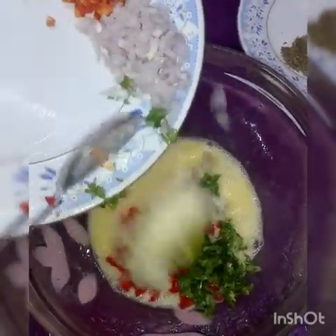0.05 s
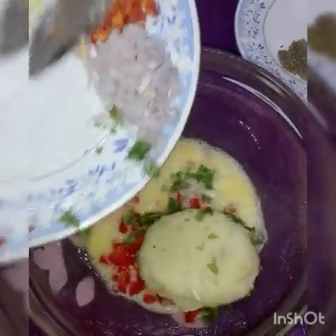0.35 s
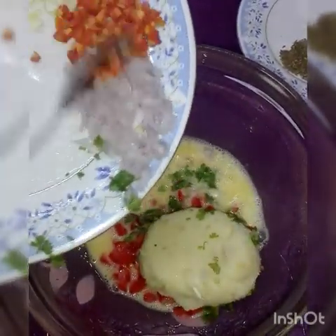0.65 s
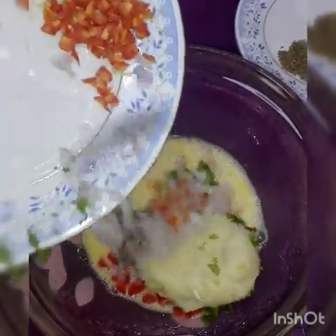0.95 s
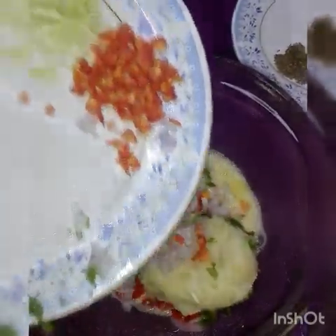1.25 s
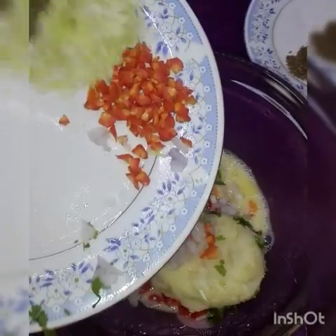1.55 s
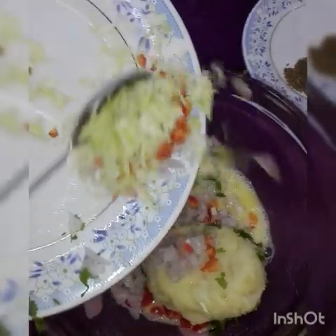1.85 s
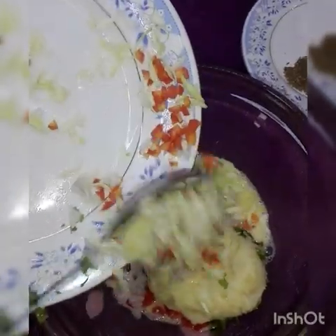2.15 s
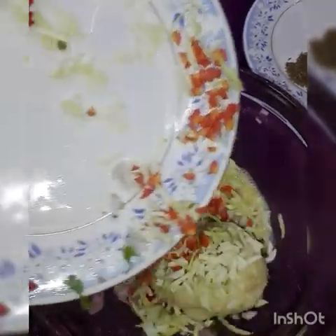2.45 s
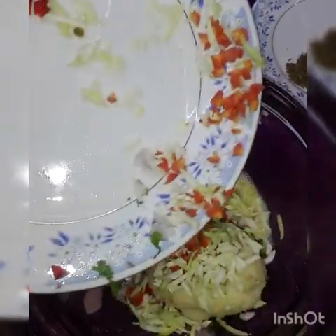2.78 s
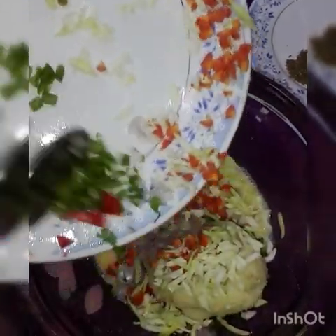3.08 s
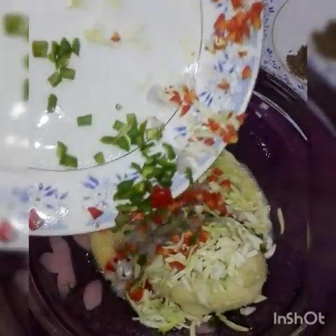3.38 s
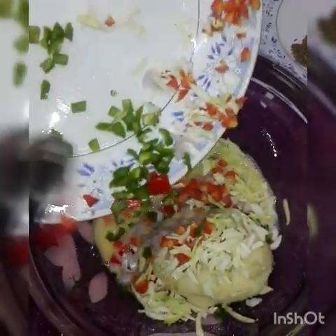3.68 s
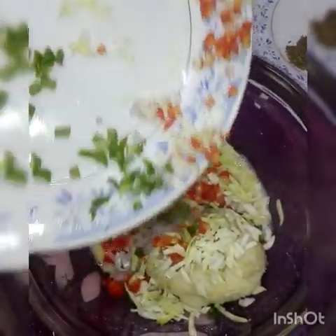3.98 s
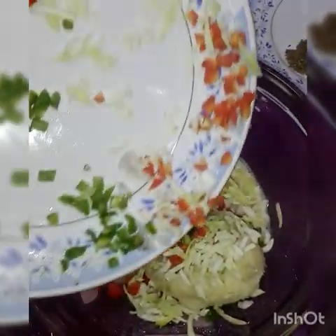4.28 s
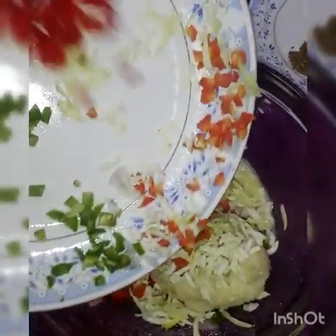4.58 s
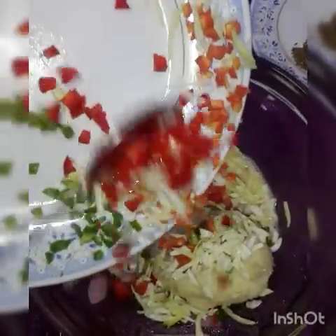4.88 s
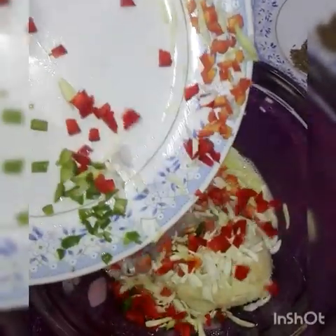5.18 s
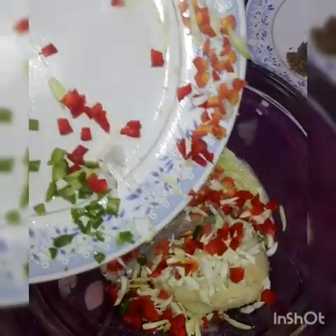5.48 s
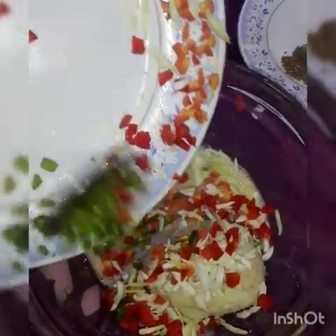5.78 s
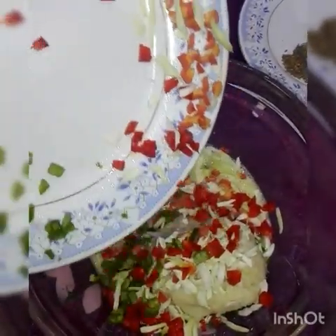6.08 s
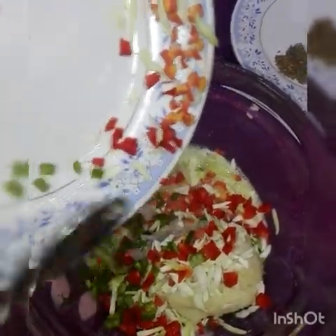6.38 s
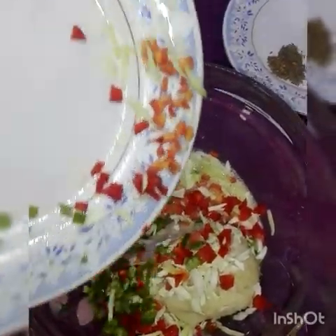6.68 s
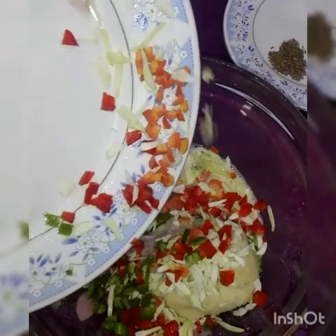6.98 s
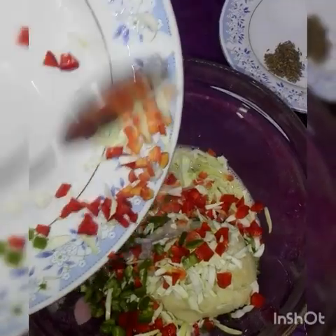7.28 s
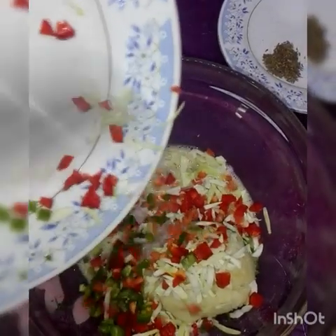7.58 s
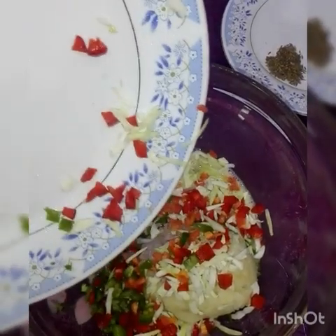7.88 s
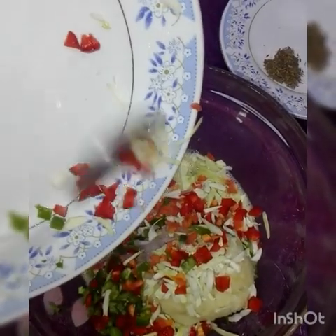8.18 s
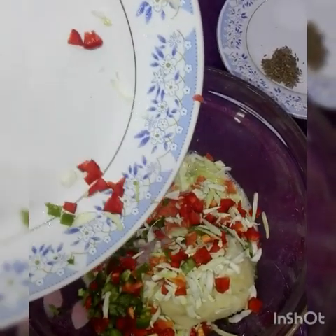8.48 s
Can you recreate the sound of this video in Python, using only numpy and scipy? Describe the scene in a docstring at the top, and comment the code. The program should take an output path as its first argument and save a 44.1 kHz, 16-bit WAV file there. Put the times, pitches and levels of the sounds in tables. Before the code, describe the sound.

In a small kitchen, a steel spoon pushes chopped vegetables off a china plate into a bowl, close to the microphone. A few bright clinks come first, with a faint wet crackle of falling pieces. Irregular taps and short scrapes over the glaze follow, some leaving a soft ring. A low rumble fills the room, and at the very end a faint two-tone horn sounds far outside.

```python
"""A steel spoon pushes chopped vegetables off a hand-held china plate into a bowl in a small kitchen.
Each stroke lands with a clink and scrapes over the glaze; both drive the plate's modes, the tones it
naturally rings at. A soft ring sings on after a touch or lift. Wet pieces tick as they fall.
A low rumble fills the room, and at the end a two-tone horn sounds far outside."""
import sys
import numpy as np
from scipy import signal
from scipy.fft import rfft, irfft, next_fast_len
from scipy.io import wavfile
from scipy.ndimage import map_coordinates

SR = 44100
rng = np.random.default_rng(int(sys.argv[2]) if len(sys.argv) > 2 else 0)


def output_pcm(signal):
    """Save a mono or channel-first signal as 16-bit PCM at the path in sys.argv[1].

    Samples are clipped to [-1, 1] before scaling.
    """
    pcm = np.clip(np.atleast_2d(signal).T, -1, 1) * 32767
    wavfile.write(sys.argv[1], SR, np.round(pcm).astype(np.int16))


N = 381024
TIME = np.arange(N) / SR

# The plate's modes with the spoon on it. A t60 is the time a sound takes to fade by 60 dB.
# (pitch [Hz], level hit at the rim [dB], level hit in the centre [dB], base t60 [s], full bend [Hz])
PLATE_MODES = [(327, -21, -22.5, 0.035, 1.5), (549, -19, -19.5, 0.027, 0), (772, -9, -8.5, 0.029, -2),
               (963, -11.5, -9, 0.062, -130), (1183, -3, -15.5, 0.14, 1), (1356.4, 0, -3, 0.18, 96),
               (1994, -3, -17, 0.13, 80), (2207, -7, -9.5, .12, 91.5), (2574, -18.5, -22.5, 0.09, -150),
               (2915, -9, -8.5, .09, 139), (3136, -4, 3.5, 0.063, 54), (3616, -12, 4, .09, 38),
               (3985, -6, -11, 0.095, -3), (4134, -6.5, -6.5, .09, 40), (4495, -15, -26, 0.089, -100),
               (5228, -5.5, -14, 0.066, 204), (5494, -9.5, -8.5, 0.081, 200), (5747, -8.5, -6, .15, 169),
               (6510, -12.5, -16.5, 0.094, -200), (7310, -11, -19.5, 0.15, 299.5),
               (7500, -8.5, -8.5, .08, 278), (8110, -7.5, -5, 0.055, -300), (8910, -9, -8.5, 0.088, -0.5),
               (9360, -13.5, -8, 0.11, -150), (9820, -17, -11, .06, -0.5), (11184, -3, -5, 0.16, 152),
               (11460, -11, -7, .05, 201.5), (13160, -8, -6.5, 0.043, 203),
               (14500, -13.5, -14, 0.049, -3.5)]
# The spoon slides, pressing harder up to a push, then easing off. Bass and treble are relative to the mids.
# (start [s], push [s], end [s], place [0 centre, 1 rim], mids at the push [dB], rise [dB], fall [dB],
#  bass [dB], treble [dB])
STROKES = [(1.374, 1.391, 1.505, 1, -36, 4, 28.5, 10, -5),
           (2.686, 2.92, 3.069, 0.18, -40.5, 28.5, 3.5, -3.5, -1),
           (3.556, 3.69, 3.728, 0.82, -25.5, 16, 5, -3, -1.5),
           (4.439, 4.69, 4.846, 0.12, -41, 18, 14, -6, -7), (5.47, 5.6, 5.795, 0.35, -34.5, 6, 12, -9, -4),
           (6.2, 6.22, 6.306, 0.27, -41, 0.5, 5.5, -6.5, -3.5),
           (6.355, 6.388, 6.407, .8, -24.5, 8.5, 13.5, -8, 4),
           (6.673, 6.926, 7.326, 0.684, -49, 9, 11, 10, -12),
           (7.881, 8.02, 8.087, 0.38, -34, 10, 18.5, -5.5, -2.5)]
# The tone colour of steel rubbing on glaze: (frequency [Hz], level [dB])
CONTACT_COLOUR = [(60, -15.5), (170, 1.5), (330, -4), (450, -8.5), (800, 6), (1500, 7), (3500, -5),
                  (6000, -5.5), (10000, -17), (14500, -14.5)]


def amp(db):
    """Turn decibels into a gain."""
    return 10 ** (np.asarray(db) / 20)


def unit(x):
    """Scale x to an average (rms) level of 1."""
    return x / np.sqrt(np.mean(x ** 2) + 1e-20)


def along(points, hz):
    """Read between (frequency, value) points on a log frequency axis."""
    freqs, values = np.transpose(points)
    return np.interp(np.log(hz + 1), np.log(freqs), values)


def curve(points, t):
    """Read between (time, value) points."""
    return np.interp(t, *np.transpose(points))


def wobble(rate, n):
    """A smooth random curve, n samples long, through `rate` random values a second."""
    return map_coordinates(rng.standard_normal(int(n * rate / SR) + 4), [np.arange(n) * rate / SR])


def filtered(x, response):
    """Scale each frequency in x by response(hz)."""
    n = x.shape[-1]
    padded = next_fast_len(n + SR // 10)
    return irfft(rfft(x, padded) * response(np.fft.rfftfreq(padded, 1 / SR)), padded)[..., :n]


def coloured(x, colour):
    """Give x a tone colour and an average level of 1."""
    return unit(filtered(x, lambda hz: amp(along(colour, hz))))


def add(track, start, x):
    """Mix x into the track from `start` seconds on."""
    part = track[max(round(start * SR), 0):][:len(x)]
    part += x[:len(part)]


def voiced(x, db, bass_db, treble_db, size):
    """Set the bass, mids and treble of x, going by its first `size` samples: hard contact is bright."""
    def bands(hz):
        below_mids, below_treble = (1 / (1 + (hz / edge_hz) ** 8) for edge_hz in (2600, 6500))
        return np.array([below_mids, below_treble - below_mids, 1 - below_treble])
    levels = (db + bass_db, db, db + treble_db)
    return sum(amp(level) * band / np.std(band[:size]) for level, band in zip(levels, filtered(x, bands)))


def grains(n, rate, spread_db):
    """Tiny random clicks of unequal size, about `rate` a second."""
    return unit((rng.random(n) < rate / SR) * rng.standard_normal(n) * amp(spread_db * rng.standard_normal(n)))


def gate(t, start, end, fade):
    """On between two times, with soft edges."""
    return np.clip((t - start) / fade + 1, 0, 1) * np.clip((end - t) / fade + 1, 0, 1)


def background(swell_db=1.76, swell_rate=6, hiss_db=-70):
    """A gently swelling rumble and the faint hiss of the room."""
    # How loud the rumble is: (time [s], level [dB])
    rumble_levels = [(0, -44.5), (3.9, -47.5), (4.5, -50), (8.4, -53), (8.6, -45.5)]
    # The tone colours of rumble and hiss: (frequency [Hz], level [dB])
    rumble_colour = [(15, -4.5), (28, -3.5), (45, 4), (62, -7), (110, -4), (140, -12), (175, -6.5),
                     (230, -25.5), (350, -37), (700, -64.5), (2000, -120)]
    hiss_colour = [(100, -5), (400, -0.5), (700, -6), (1100, -1), (1700, -6), (3000, -10.5), (7000, -15),
                   (14000, -17.5)]
    level_db = curve(rumble_levels, TIME) + swell_db * wobble(swell_rate, N)
    rumble = amp(level_db) * coloured(rng.standard_normal(N), rumble_colour)
    return rumble + amp(hiss_db) * coloured(rng.standard_normal(N), hiss_colour)


def mode_gains(place):
    """How strongly a touch between centre (0) and rim (1) drives each mode."""
    _, rim_db, centre_db, _, _ = np.transpose(PLATE_MODES)
    gain = amp(centre_db + np.clip(place, 0, 1) * (rim_db - centre_db))
    return gain / np.linalg.norm(gain)


def sweet_spot(hz, favoured_hz, boost_db, reach=0.021):
    """A mode that swings widest right under the spoon is driven harder."""
    return amp(boost_db * np.exp(-((hz / favoured_hz - 1) / reach) ** 2))


def bend(t):
    """The sliding spoon's weight bends the modes' pitch, most in mid-stroke at the plate's centre."""
    return sum(np.sin(np.pi * np.clip((t - start) / (end - start), 0, 1)) * (1 - np.clip(place, 0, 1))
               for start, _, end, place, *_ in STROKES)


def choked(x, place, bare_db=-10):
    """Under the pressing spoon the modes blur into broad humps, with a little contact noise between."""
    mode_hz = np.transpose(PLATE_MODES)[0][:, None]
    width_hz = 60 + .028 * mode_hz
    humps = lambda hz: np.sqrt(mode_gains(place) ** 2 @ np.exp(-((hz - mode_hz) / width_hz) ** 2))
    return unit(filtered(x, humps)) + amp(bare_db) * coloured(x, CONTACT_COLOUR)


def clinks(scatter_db=2, split=0.0053, damping=1.2, clash_db=-1, clash_t60=.045, attack_s=.0013):
    """Each blow rings the modes that its place favours, over a short clash of steel on glaze."""
    # The spoon hits the plate: (time [s], mids [dB], bass over mids [dB], treble over mids [dB],
    # place [0 centre, 1 rim], favoured mode [Hz], chatter [s])
    blows = [(0.0481, -16, 0.5, -6.5, 1, 2023, 0.0068), (0.7143, -7, -11, -13, 0.96, 4000, 0.0034),
             (0.8052, -33.5, 6, -16, 1, 1940, .028), (1.337, -14, -0.5, -7, 0.3, 1319, 0.005),
             (1.3899, -32.5, 8.5, -9, 0.87, 1357, 0.016), (1.4525, -46, 12, -22, 0.72, 2060, .005),
             (1.5129, -26.5, -2, -5, 0.61, 5750, 0.0064), (1.7331, -65.5, 18, -12.5, 0.33, 4460, 0.019),
             (1.966, -54.5, 25, -18, 0.44, 2030, 0.0081), (2.1541, -44.5, 10.5, -24.5, 0.37, 2150, 0.0034),
             (2.6429, -24.5, -4.5, 2, 0.3, 4080, 0.0084), (2.7659, -25, -8.5, -1.5, 0, 3750, 0.0069),
             (2.848, -53, -2, 12, 0.26, 3050, 0.0036), (2.9721, -34, -7.5, 1.5, .32, 3770, 0.0021),
             (3.0747, -21, 1, 1, 1, 5480, 0.0071), (3.1566, -38.5, -3.5, -6.5, 0.91, 4150, .005),
             (3.5159, -22.5, 2.5, 8, 0.84, 1357, .013), (3.721, -29.5, 0, -3.5, 1, 5200, 0.006),
             (3.7564, -28.5, -3.5, -1.5, 0.87, 4130, 0.03), (4.3998, -24, -11, -2, .12, 7555, 0.0062),
             (4.605, -53.5, 16, -15, 0.71, 1980, 0.0099), (4.6588, -36, -4.5, -9, 0.81, 3730, 0.0081),
             (4.844, -44, -14, -2.5, 0.14, 3130, .005), (5.4203, -12, -14.5, -11.5, 0, 3564, .008),
             (5.5718, -29, -10.5, -11, 0.12, 3250, 0.0074), (5.6682, -28, -19, -4, .38, 4170, 0.0027),
             (5.7374, -25.5, -11.5, -4.5, 0.34, 3360, 0.012), (5.7988, -32, -4.5, 2, 1, 5260, 0.0059),
             (6.1699, -11, -15, -11, 0.057, 3575, .004), (6.2426, -32.5, -12.5, -1, 0.53, 3200, 0.0045),
             (6.296, -38.5, -7.5, 1.5, 0.039, 3170, 0.0085), (6.3225, -17, 0.5, 0.5, 0.97, 5470, 0.015),
             (6.6325, -39, 9, -20, 0.58, 3290, .005), (6.7067, -52.5, 17, -25, 0.56, 2240, .005),
             (6.8477, -50, 14.5, -10, 0.79, 2130, 0.011), (6.9153, -42, -11, -6.5, 0.79, 3140, 0.0065),
             (7.1576, -38, -4, -0.5, 0.92, 3230, 0.025), (7.3722, -23.5, -6.5, -3.5, 0.67, 3035, 0.035),
             (7.8377, -11, -13.5, -5.5, 0.036, 3630, 0.006), (7.9661, -38, 4.5, -3, 0.86, 1357, 0.01),
             (8.0905, -43.5, -7.5, -15, 0, 3140, 0.0043)]
    out, t = np.zeros(N), np.arange(SR // 6) / SR
    rest_hz, _, _, t60, bend_hz = np.transpose(PLATE_MODES)[:, :, None]
    for start, db, bass_db, treble_db, place, favoured_hz, chatter in blows:
        fading = np.maximum(t - chatter, 0)  # the spoon chatters on the glaze before the ring fades
        decay = np.exp(-np.log(1000) * damping * fading / t60)
        strength, gap, phase, load = rng.standard_normal((4, len(PLATE_MODES), 1))
        hz = rest_hz + bend_hz * (bend(start) + .2 * load)  # each landing spot bends the pitch its own way
        beats = np.cos(2 * np.pi * hz * split * gap * t)  # the spoon's weight splits each mode in two
        gain = mode_gains(place)[:, None] * amp(scatter_db * strength)
        gain *= sweet_spot(hz, favoured_hz, boost_db=5)
        ring = np.sum(gain * decay * beats * np.sin(2 * np.pi * (hz * t + phase)), axis=0)
        clash = amp(clash_db - 60 * fading / clash_t60) * choked(rng.standard_normal(len(t)), place)
        blow = (np.sqrt(2) * ring + clash) * (1 - np.exp(-t / attack_s))
        add(out, start, voiced(blow, db, bass_db, treble_db, size=SR // 50))
    return out


def vegetables(tick_db=-7, tick_t60=0.018, thinning=1.7):
    """Wet pieces crackle ahead of the spoon and drop one by one."""
    # The spoon sweeps through the pieces: (start [s], end [s], level [dB])
    sweeps = [(0.048, 0.336, -42.5), (0.777, 1.117, -44.5), (1.89, 2.103, -67.5), (2.125, 2.419, -69.5)]
    # Single pieces land: (time [s], level relative to tick_db [dB])
    landings = [(0.8814, -39), (0.9204, -34), (1.042, -48), (1.8974, -51), (2.044, -46), (2.1206, -49),
                (2.2552, -47), (2.3594, -48.5), (4.9954, -49.5)]
    # The tone colour of wet food: (frequency [Hz], level [dB])
    wet_colour = [(500, -1.5), (1500, -2.5), (4000, 2), (7500, 1), (12000, -2.5), (14500, -4.5)]
    flow = np.zeros(N)
    for start, end, db in sweeps:
        remaining = np.clip((end - TIME) / (end - start), 0, 1)
        flow += gate(TIME, start, end, fade=.02) * amp(db) * remaining ** thinning
    out = flow * coloured(grains(N, rate=4800, spread_db=-1), wet_colour)
    t = np.arange(SR // 20) / SR
    for start, db in landings:
        splat = coloured(rng.standard_normal(len(t)), wet_colour)
        add(out, start, amp(db + tick_db - 60 * t / tick_t60) * splat)
    return out


def lingering_ring(rise_s=0.019):
    """The ring swells after a touch or lift and sings on softly."""
    # Tones that ring on, the plate's and one near 4450 Hz probably from spoon or bowl:
    # (pitch [Hz], level [dB], t60 [s])
    tones = [(447, -12, 1.1), (662, -11, .35), (1140, 0, .9), (2065, -4, .5), (2885, -13, .35),
             (4450, -14, .3), (5460, -16, .3), (5745, -12, .35), (7450, -19, .25)]
    # A ring begins: (time [s], base level [dB], favoured mode [Hz])
    rings = [(0.248, -62, 1140), (.74, -42, 5745), (.83, -62, 1140), (0.989, -71, 1140), (1.4, -51.5, 1134),
             (1.514, -50.5, 5700), (1.732, -61.5, 660), (1.78, -65.5, 1140), (1.968, -52, 2065),
             (2.155, -60.5, 2065), (3.09, -53.5, 5460), (6.391, -54.5, 5800), (6.634, -42, 4480),
             (6.92, -51, 4500), (7.411, -56.5, 5600)]
    out, t = np.zeros(N), np.arange(SR) / SR
    for start, db, favoured_hz in rings:
        for hz, tone_db, t60 in tones:
            envelope = amp(db + tone_db - 60 * t / t60) * (1 - np.exp(-t / rise_s))
            gain = sweet_spot(hz, favoured_hz, boost_db=17, reach=.15)
            add(out, start, gain * envelope * np.sin(2 * np.pi * hz * t))
    return out


def catches(n, catch_db=-12, db_per_s=24, release_s=0.009):
    """Drag on the spoon jumps wherever its edge catches; long strokes stick and slip the most."""
    jumps = np.abs(grains(n, rate=50, spread_db=3))
    drag = signal.lfilter([1], [1, -np.exp(-1 / (release_s * SR))], jumps)
    return 1 + amp(catch_db + db_per_s * n / SR) * unit(drag)


def scrapes(level_db=-1, grit_db=-9, rasp_db=-14, judder_db=2, damping=5.5, fade_s=.015):
    """The spoon's edge slips over the glaze in tiny jerks that drive the plate's damped, gliding modes."""
    out = np.zeros(N)
    for start, push, end, place, db, rise_db, fall_db, bass_db, treble_db in STROKES:
        t = TIME[round((start - fade_s) * SR):round((end + fade_s) * SR)]
        n = len(t)
        slips = grains(n, rate=12000, spread_db=2.5) * amp(judder_db * wobble(70, n)) * catches(n)
        pull, ring = bend(t), 0
        for gain, (hz, _, _, t60, bend_hz) in zip(mode_gains(place), PLATE_MODES):
            rocking = 1 + .4 * wobble(22, n)  # the spoon rocks, so each pitch wanders
            tone = np.exp(2j * np.pi * np.cumsum(hz + bend_hz * pull * rocking) / SR)
            decay = np.exp(-np.log(1000) * damping / (t60 * SR))
            # Keep the part of the slips near this tone; smoothing twice keeps the gaps between modes quiet.
            swing = signal.lfilter([1], np.poly([decay, decay]), slips / tone)
            ring = ring + gain * unit((tone * swing).real)
        grit = amp(grit_db) * choked(slips, place)
        rasp = amp(rasp_db) * coloured(slips, CONTACT_COLOUR)
        eased_db = np.interp(t, [start, push, end], [rise_db, 0, fall_db])
        # A lighter touch is quieter and duller.
        scrape = voiced(unit(ring) + grit + rasp, db - eased_db,
                        bass_db + .25 * eased_db, treble_db - .15 * eased_db, size=n)
        add(out, t[0], gate(t, start, end, fade_s) * scrape)
    return amp(level_db) * out


def horn(waver_db=4, rasp=0.17):
    """Two rasping notes about a minor third apart, each harmonic wavering on its way through the street."""
    # The horn swells and holds: (time [s], base level [dB])
    swell = [(8.26, -79), (8.33, -61.5), (8.48, -60.5), (8.64, -61)]
    # Its two notes: (pitch [Hz], level [dB])
    notes = [(634.5, 3.5), (741.5, 3.5)]
    # The tones that make up each note: (multiple of the pitch, level [dB])
    harmonics = [(1, -7.5), (2, -1.5), (3, -5), (4, -13), (5, -25.5)]
    out, t = np.zeros(N), TIME[TIME > swell[0][0]]
    for hz, note_db in notes:
        phase = 2 * np.pi * hz * t + rasp * (2 * wobble(29, len(t)) + wobble(185, len(t)))
        for multiple, db in harmonics:
            level_db = curve(swell, t) + note_db + db + waver_db * wobble(19.5, len(t))
            add(out, t[0], amp(level_db) * np.sin(multiple * phase))
    return out


def kitchen_echo(x):
    """The hard walls answer with a short echo that dies fastest around 7500 Hz."""
    # How long the room rings: (frequency [Hz], t60 [s])
    ring_times = [(150, .25), (1000, 0.36), (3000, 0.37), (5500, .33), (7500, 0.15), (14000, 0.33)]
    hz, t, noise = signal.stft(rng.standard_normal(SR // 2), SR, nperseg=256)
    decay = amp(-60 * t / along(ring_times, hz)[:, None])
    _, tail = signal.istft(noise * decay, SR, nperseg=256)
    delayed_tail = np.pad(tail / np.linalg.norm(tail), (SR // 200, 0))
    return signal.fftconvolve(x, delayed_tail)[:N]


def stereo_side(x, side_db=-14, above_hz=4800):
    """The part that differs between left and right: only the high frequencies."""
    return amp(side_db) * filtered(x, lambda hz: 1j * (1 - 1 / (1 + (hz / above_hz) ** 12)))


def scene(echo_db=-14):
    """Plate and food close by, the kitchen around them, the street beyond."""
    near = clinks() + scrapes() + lingering_ring() + vegetables()
    mid = near + amp(echo_db) * kitchen_echo(near) + background() + horn()
    side = stereo_side(near)
    return np.array([mid + side, mid - side])


def record(dry, hardness=6, top_hz=14500):
    """Round off the loudest clinks at full scale and cut the very highest treble."""
    rounded = dry / (1 + np.abs(dry) ** hardness) ** (1 / hardness)
    return filtered(rounded, lambda hz: np.clip((top_hz - hz) / 400 + .5, 0, 1))


dry = scene()
out = record(dry)
output_pcm(out)
```